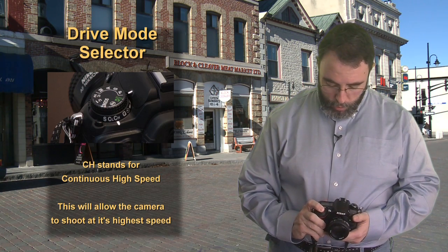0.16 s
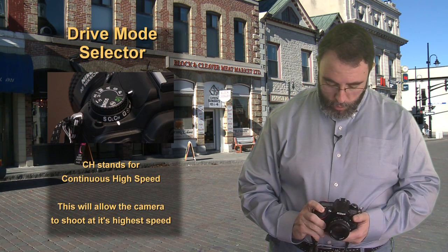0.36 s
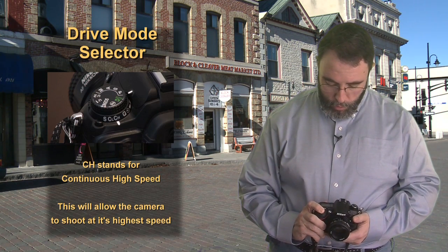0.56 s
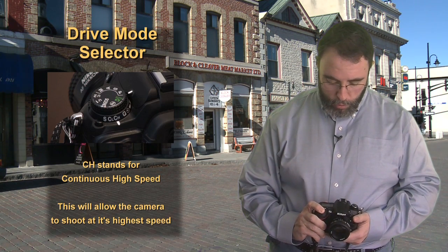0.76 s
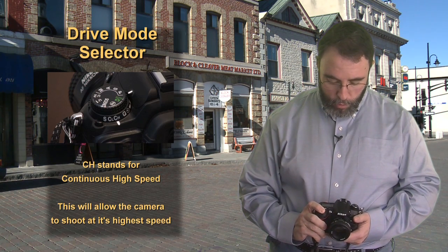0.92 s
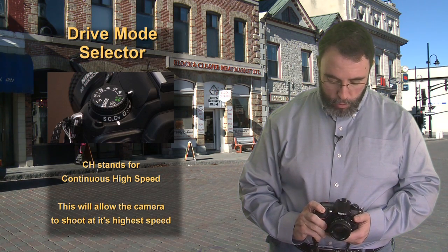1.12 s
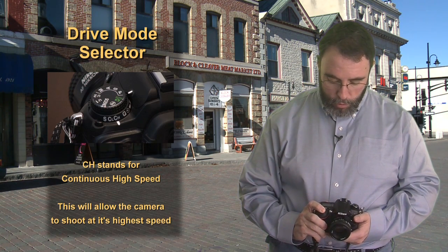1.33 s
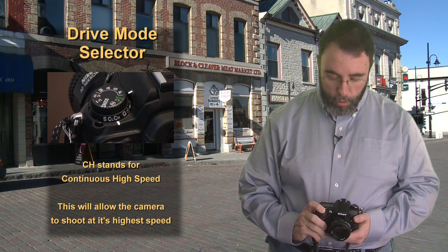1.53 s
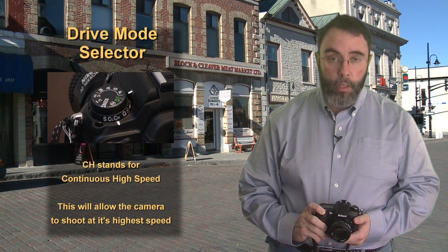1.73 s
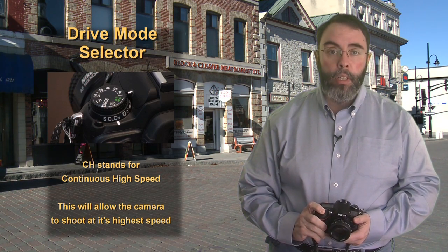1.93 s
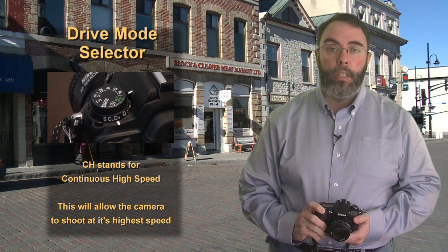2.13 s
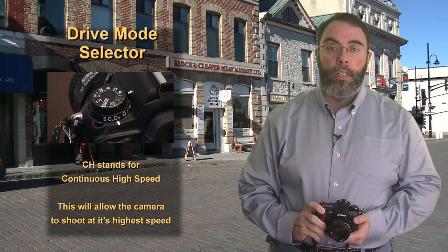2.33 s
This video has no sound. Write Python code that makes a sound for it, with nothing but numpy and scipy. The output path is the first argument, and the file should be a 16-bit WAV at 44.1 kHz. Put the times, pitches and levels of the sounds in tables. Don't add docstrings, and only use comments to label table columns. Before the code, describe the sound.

Close, dry camera shutter burst in a small room; the tail of one frame, faint finger rubbing and ticks, then nine hard mechanical clacks, each with a tiny motor whirr, soon settling into an even rhythm.

```python
import sys
import numpy as np
from scipy import signal
from scipy.fft import rfft, irfft, next_fast_len
from scipy.io import wavfile
from scipy.ndimage import uniform_filter1d

SR = 44100
rng = np.random.default_rng(int(sys.argv[2]) if len(sys.argv) > 2 else 0)


def linear_from_db(decibels):
    return 10 ** (np.asarray(decibels, float) / 20)


def put_to_file(sound):
    columns = np.atleast_2d(sound).T
    safe = np.clip(columns, -1, 1)
    whole_steps = np.round(safe * 32767)
    wavfile.write(sys.argv[1], SR, whole_steps.astype(np.int16))


N = 104649
LEAD = SR // 5
LONG = N + 2 * LEAD

BLOW_S = [-.0722, .3009, .5587, .7535, .9448, 1.1356, 1.3204, 1.5071, 1.7015, 1.8885]
FRAME_DB = [-0.5, -.5, 0, -0.5, 0.13, 0.17, -.5, -0.05, -0.06, 0.1]


def along(points, hz):
    point_hz, value = np.transpose(points)
    return np.interp(np.log(hz + 1), np.log(point_hz + 1), value)


def unit(x):
    return x / np.sqrt(np.mean(x ** 2) + 1e-20)


def filtered(x, response):
    n = x.shape[-1]
    m = next_fast_len(n + 8192)
    return irfft(rfft(x, m) * response(np.fft.rfftfreq(m, 1 / SR)), m)[..., :n]


def modes(table):
    def response(f):
        total = 0
        for k, (hz, width, db) in enumerate(table):
            total = total + (-1) ** k * linear_from_db(db) * 1j * f * width / (hz * hz - f * f + 1j * f * width)
        return total
    return response


def ring_body(forces, frame_hz):
    # pitch_hz, width_hz, level_db
    shell = [(312, 130, -16.5), (412.6, 350, 3), (559, 360, 5.5), (699, 94, 5), (952, 235, -8),
             (1071, 140, 3.5)]
    frame = [(1404, 50, -37.5), (1512, 20, -5), (1665.5, 64, -3), (1997, 270, -12), (1977, 600, -17)]
    mount = [(2350, 170, -12.5), (2964, 345, -2), (3210, 113, -5.5), (3240, 1100, -7.5)]
    mirror = [(4145, 224, 2.5), (4983, 410, 6), (5700, 210, -1.5), (5960, 580, -9.5)]
    blades = [(5756, 630, -2), (6330, 1800, -5.5), (8410, 600, -2.5), (9590, 280, -0.5), (10610, 980, -5.5),
              (11350, 910, -2.5), (12430, 2100, -7), (15300, 670, -12.5)]

    def response(f):
        frame_rings = modes([(frame_hz, 304, 0)])(f) + modes(frame)(f)
        return [modes(shell)(f), frame_rings, modes(mount)(f), modes(mirror)(f), modes(blades)(f)]
    return filtered(forces, response)


def contacts(times_s, table, push, push_s, late_s):
    rattle_s = (0.00013, 0.00028, 0.00065, 0.00032, 0.0014)
    new_share = 0.25
    level_scatter_db, time_scatter_s = 1.2, 0.0001
    shell_db = -13
    x = np.zeros(LONG)
    t = np.arange(SR // 25) / SR
    age = t / np.array(rattle_s)[:, None]
    fade = np.sqrt(age) * np.exp(-age)
    fade /= np.linalg.norm(fade, axis=1, keepdims=True)
    bump = np.sin(np.pi * np.clip((t + 0.5 / SR) / push_s, 0, 1)) ** 2
    for after_s, (frame_hz, frame_db, *parts_db) in zip(times_s, table):
        noise = rng.standard_normal((len(FRAME_DB) + 1, *fade.shape))
        rattle = (np.sqrt(1 - new_share) * noise[:1] + np.sqrt(new_share) * noise[1:]) * fade
        rings = ring_body(rattle - push * bump / bump.sum(), frame_hz)
        peak = np.abs(rings).max(axis=2, keepdims=True)
        rings *= linear_from_db([frame_db + shell_db, frame_db, *parts_db])[:, None] / peak
        for blow_s, late, db, ring in zip(BLOW_S, late_s, FRAME_DB, rings):
            start_s = blow_s + late + after_s + time_scatter_s * rng.normal()
            at = LEAD + round(start_s * SR)
            gains = linear_from_db(db + level_scatter_db * rng.normal(size=len(ring)))
            x[at:at + len(t)] += gains @ ring
    return x


def hard_contacts():
    hard_s = [-.0305, -.0228, -.0115, -.0075, 0, .0011, .0226, .0238, .0307, .0318, .0515, .0682, .0715,
              .0853]
    # frame_pitch_hz, frame_db, mount_db, mirror_db, blades_db
    hard = [(1500, -48, -52, -58, -66), (1300, -39, -44, -38, -31), (1500, -36, -42, -40, -34),
            (1500, -40, -44, -38, -32), (1400, -23, -22, -16, -22), (1400, -20, -25, -20, -30),
            (1660, -21, -30, -18, -19), (1660, -19, -32, -25, -31), (1720, -22, -28, -26, -21),
            (1720, -21, -30, -28, -27), (1480, -30, -34, -31, -32), (1420, -33, -29, -40, -37),
            (1450, -41, -38, -34, -34), (1600, -33, -38, -41, -34)]
    return contacts(hard_s, hard, push=0.59, push_s=2 / SR, late_s=np.zeros(len(FRAME_DB)))


def padded_stops():
    padded_s = [.0084, .0093, .0165, .0355, .0625, .0756, .0772, .079, .081]
    # frame_pitch_hz, frame_db, mount_db, mirror_db, blades_db
    stops = [
        (1440, -26, -28, -29, -26),
        (1450, -8.5, -17, -28, -28),
        (1480, -30, -37, -40, -41),
        (1500, -32, -40, -48, -38),
        (1480, -36, -42, -45, -43),
        (1620, -28, -35, -38, -36),
        (1620, -22, -31, -38, -37),
        (1620, -24, -33, -40, -39),
        (1620, -31, -38, -47, -41),
    ]
    slap_late_s = [0, -.0007, -.0006, .0002, .0004, 0, .0004, 0, .0004, -.0001]
    return contacts(padded_s, stops, push=5, push_s=0.0004, late_s=slap_late_s)


def effort():
    # time_after_blow_s, effort_db
    run = [
        (-.024, -94),
        (-.021, -38.5),
        (-.002, -42),
        (.004, -33.5),
        (0.031, -32.5),
        (.06, -36),
        (0.082, -33),
        (0.09, -38.5),
        (0.108, -48),
    ]
    t = (np.arange(LONG) - LEAD) / SR
    after_s, run_db = np.transpose(run)
    gain = np.zeros(LONG)
    for blow_s, frame_db in zip(BLOW_S, FRAME_DB):
        gain += linear_from_db(frame_db + np.interp(t - blow_s, after_s, run_db, left=-120, right=-120))
    return gain


def motor():
    parts_db = (-1.5, 5, -1.5, -9.5, -4.5)
    teeth_per_s, tooth_spread_db, hiss_db = 2000, 2.5, -4
    gear_hz = 1435
    thump_hz, thump_db = 36, -58
    gains = linear_from_db(parts_db)[:, None]
    shape = (len(gains), LONG)
    teeth = (rng.random(LONG) < teeth_per_s / SR) * linear_from_db(tooth_spread_db * rng.exponential(size=LONG))
    knocks = unit(teeth) * rng.standard_normal(shape)
    hiss = linear_from_db(hiss_db) * rng.standard_normal(shape)
    drive = gains * (knocks + hiss)
    steady = ring_body(drive, gear_hz).sum(axis=0)
    pull = effort()
    whirr = ring_body(drive * pull, gear_hz).sum(axis=0) / np.std(steady)
    slow = unit(filtered(rng.standard_normal(LONG), lambda f: modes([(thump_hz, 25, 0)])(f) ** 2))
    return whirr + linear_from_db(thump_db) * slow * unit(uniform_filter1d(pull, SR // 30))


def finger():
    # start_s, peak_db, pitch_hz
    ticks = [
        (0.0694, -49, 12600),
        (0.089, -33, 12400),
        (0.1131, -39, 10200),
        (0.1303, -28, 11100),
        (0.1424, -26.5, 11700),
        (0.1524, -44, 11800),
        (0.2064, -30, 14100),
        (0.2214, -36, 9460),
        (0.2523, -21, 10400),
    ]
    # pitch_hz, width_hz, level_db
    creak_rings = [(1380, 60, 0), (2180, 60, -4)]
    # time_s, level_db
    rub_swell = [
        (0, -75),
        (.09, -62),
        (.14, -56),
        (.2, -59),
        (.27, -65),
        (.5, -74),
        (.7, -76),
    ]
    # pitch_hz, level_db_per_hz
    skin = [(1500, -28), (4000, -9), (10000, -9), (16000, -3)]
    tick_width_hz, tick_decay_s, tick_db = 3000, 0.00047, -11.5
    creak_at_s, creak_spread_s, creak_db = 0.14, 0.012, -57
    x = np.zeros(LONG)
    t = np.arange(SR // 200) / SR
    for start_s, peak_db, hz in ticks:
        burst = np.exp(-t / tick_decay_s) * rng.standard_normal(len(t))
        tick = filtered(burst, modes([(hz, tick_width_hz, 0)]))
        at = LEAD + round(start_s * SR)
        x[at:at + len(t)] += linear_from_db(peak_db + tick_db) * tick / np.abs(tick).max()
    when = (np.arange(LONG) - LEAD) / SR
    creak = unit(filtered(rng.standard_normal(LONG), modes(creak_rings)))
    creak = creak * np.exp(-((when - creak_at_s) / creak_spread_s) ** 2 / 2)
    rub = unit(filtered(rng.standard_normal(LONG), lambda f: linear_from_db(along(skin, f))))
    rub = rub * linear_from_db(np.interp(when, *np.transpose(rub_swell)))
    return x + linear_from_db(creak_db) * creak + rub


def room(x):
    # pitch_hz, t60_s
    decay = [(300, 0.6), (1100, 0.22), (1700, 0.26), (2800, 0.31), (5000, 0.23), (14000, 0.36)]
    gap_s = 0.0024
    hz, t, z = signal.stft(rng.standard_normal(SR // 2), SR, nperseg=256)
    dying = z * linear_from_db(-60 * t / along(decay, hz)[:, None])
    tail = signal.istft(dying, SR, nperseg=256)[1]
    delayed = np.pad(x, (round(gap_s * SR), 0))
    return signal.fftconvolve(delayed, tail / np.linalg.norm(tail))[:len(x)]


def air():
    # pitch_hz, level_db_per_hz
    floor = [(15, -43), (25, -19), (108, -7), (384, -17), (476, -8), (545, -19.5), (1160, -14.5),
             (1560, -26), (16000, -38)]
    air_db, patchy_db = -56.5, 1
    z = signal.stft(rng.standard_normal(LONG), nperseg=512)[2]
    patches = uniform_filter1d(uniform_filter1d(rng.standard_normal(z.shape), 6, 0), 14, 1)
    hush = signal.istft(z * linear_from_db(patchy_db * unit(patches)), nperseg=512)[1][:LONG]
    return linear_from_db(air_db) * unit(filtered(hush, lambda f: linear_from_db(along(floor, f))))


def capsules(mono):
    # pitch_hz, left_over_right_db
    tilt = [(60, -5.5), (240, -5), (950, -4.5), (3770, -5), (15000, -3.0)]
    # pitch_hz, level_db
    unshared = [(100, -21), (1500, -45), (5000, -16.5), (14000, -12.5)]
    n = SR // 100
    smear = rng.standard_normal(n) * np.exp(-np.arange(n) / (0.004 * SR))
    smeared = signal.fftconvolve(mono, smear / np.linalg.norm(smear))[:len(mono)]
    apart = filtered(smeared, lambda f: linear_from_db(along(unshared, f)))
    pair = np.array([mono + apart, mono - apart])
    return filtered(pair, lambda f: linear_from_db(along(tilt, f) * [[0.5], [-0.5]]))


def scene():
    near = hard_contacts() + padded_stops() + motor() + finger()
    room_db = -15.5
    mono = near + linear_from_db(room_db) * room(near) + air()
    return capsules(mono)[:, LEAD:LEAD + N]


def roll_off(x):
    return signal.sosfilt(signal.butter(12, 16630, fs=SR, output="sos"), x)


def record(dry):
    top_hz = 15900
    mix = filtered(dry, lambda f: 1 / (1 + (f / top_hz) ** 90))
    return roll_off(mix)


dry = scene()
out = record(dry)
put_to_file(out)
```